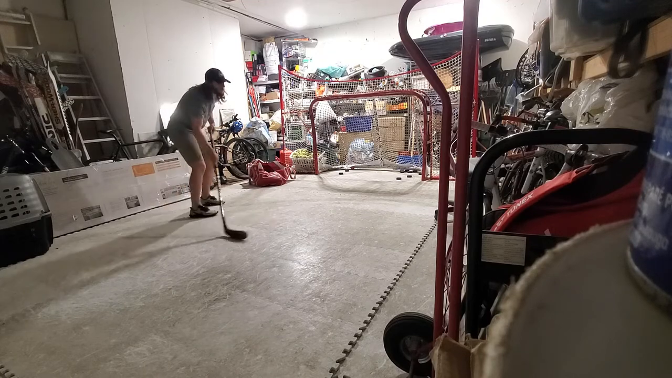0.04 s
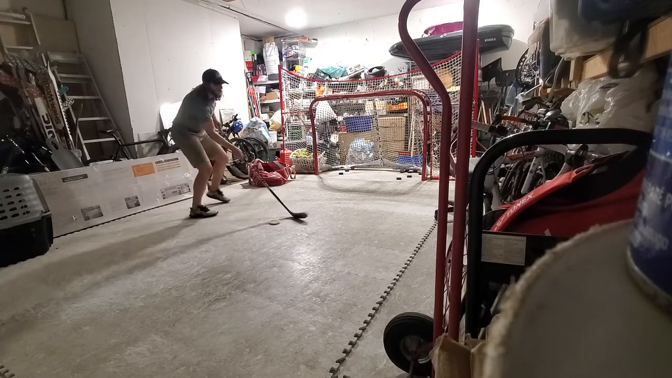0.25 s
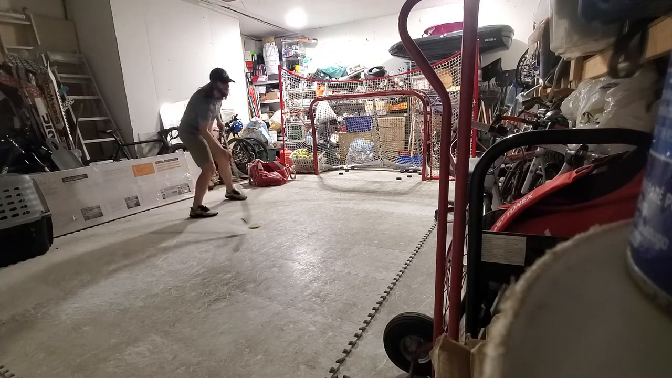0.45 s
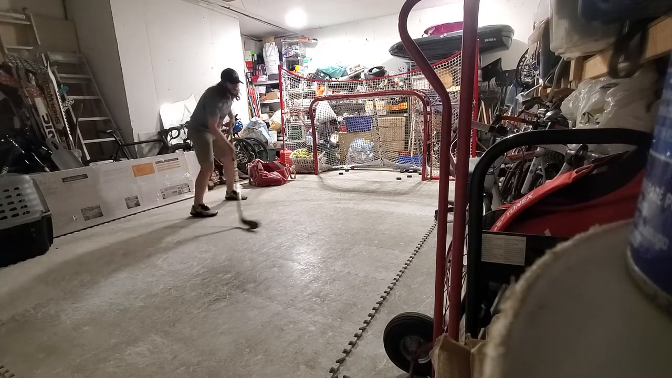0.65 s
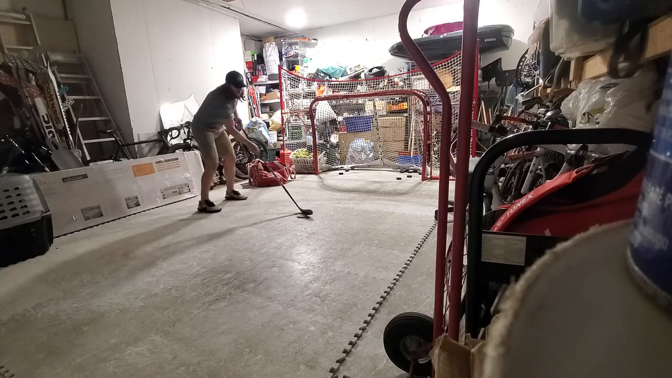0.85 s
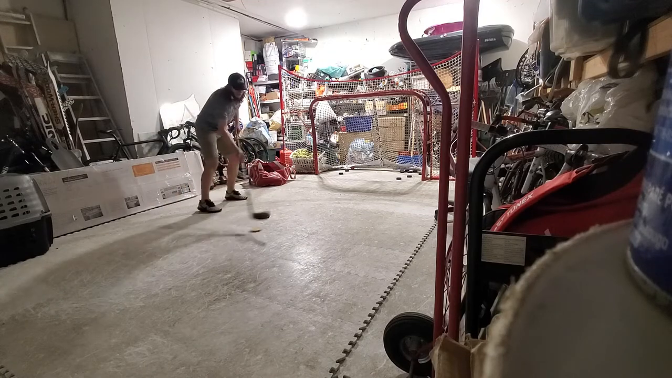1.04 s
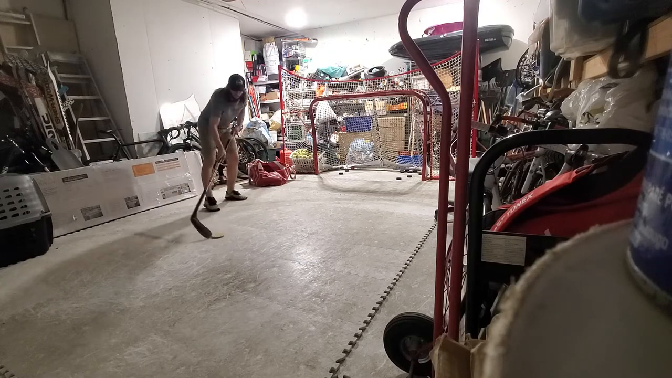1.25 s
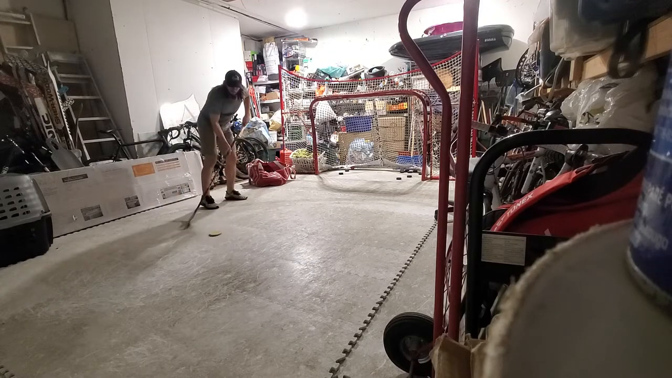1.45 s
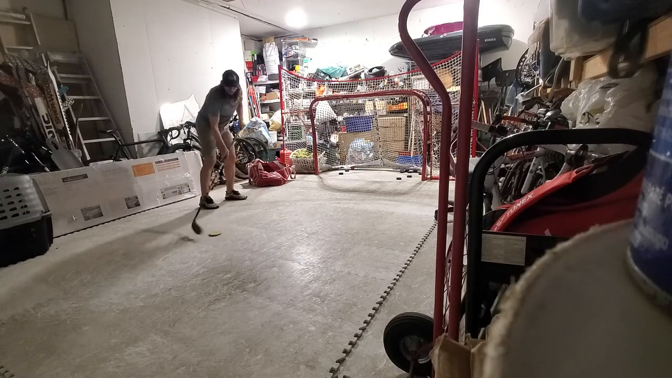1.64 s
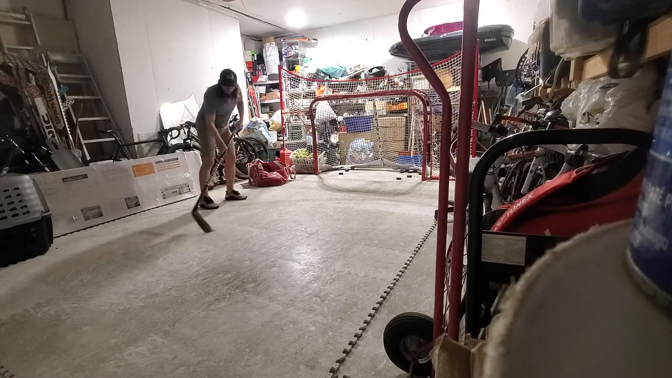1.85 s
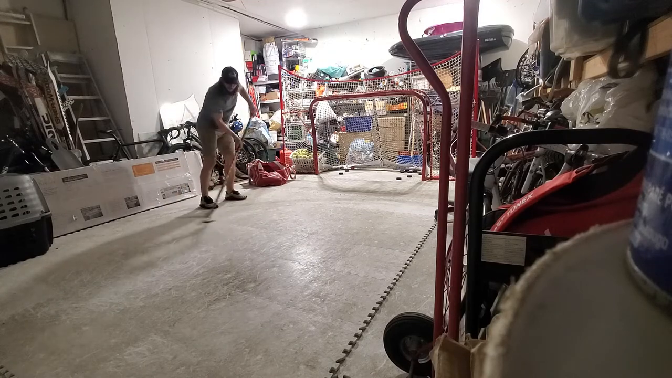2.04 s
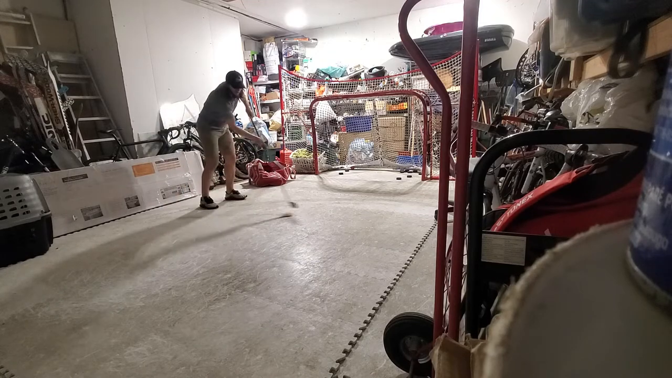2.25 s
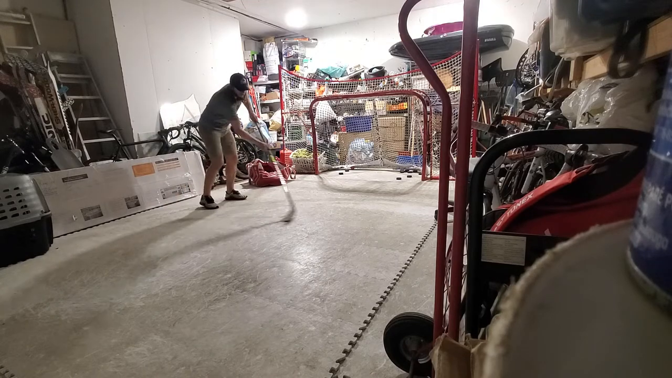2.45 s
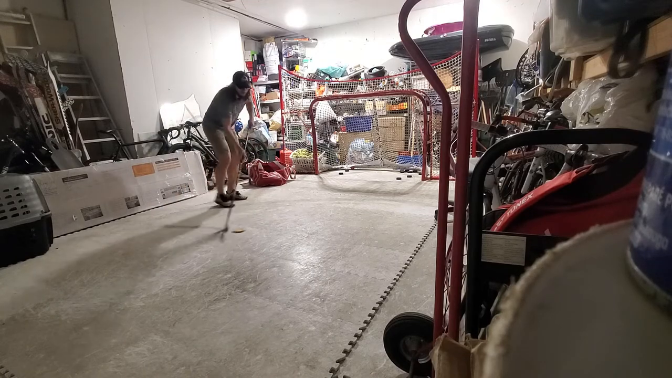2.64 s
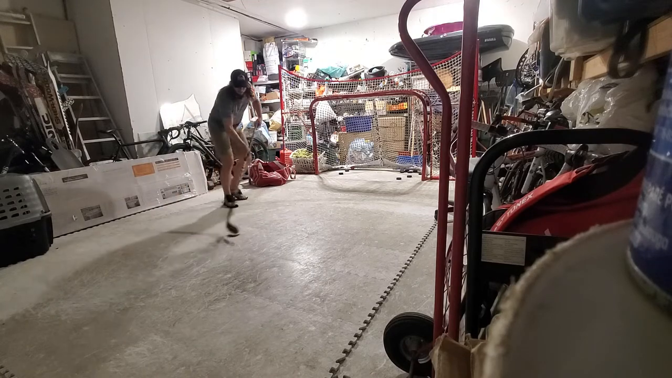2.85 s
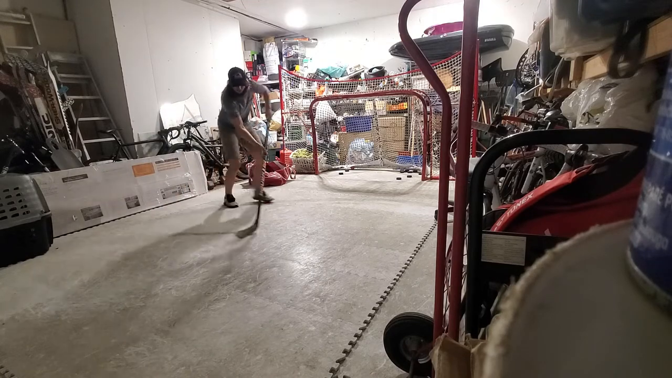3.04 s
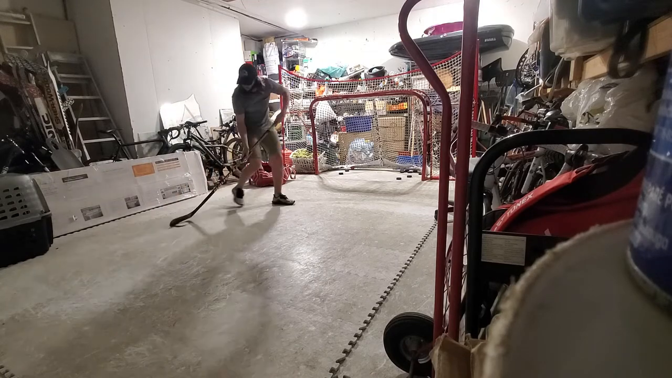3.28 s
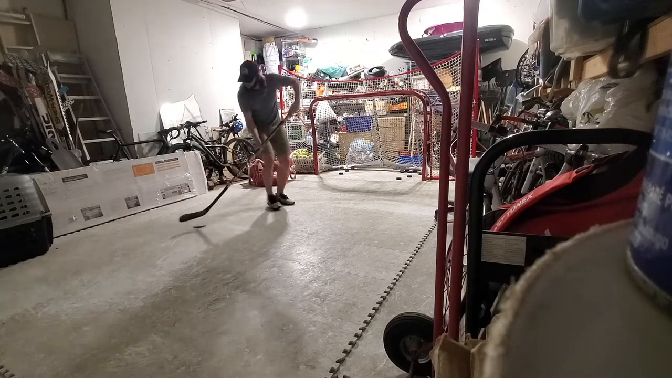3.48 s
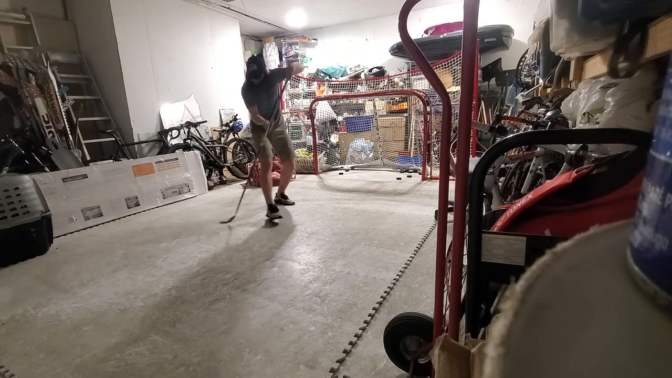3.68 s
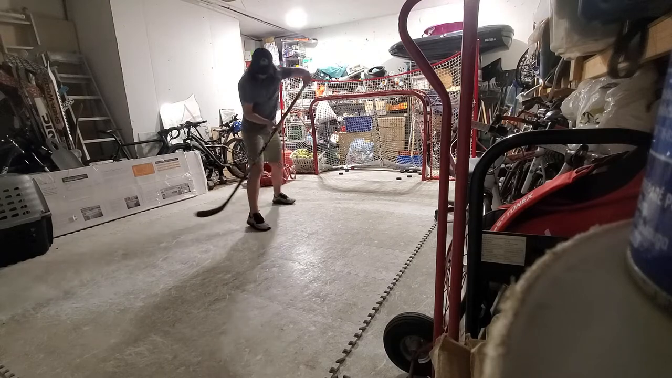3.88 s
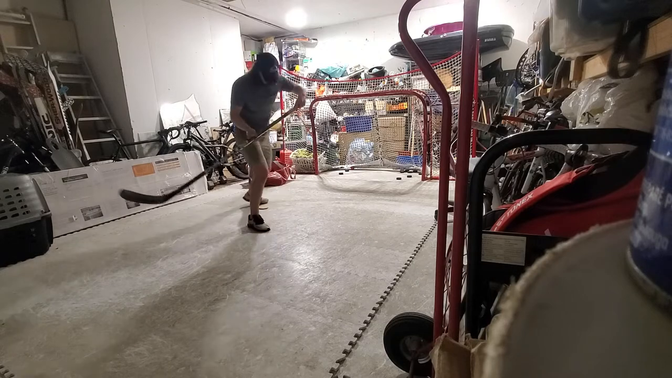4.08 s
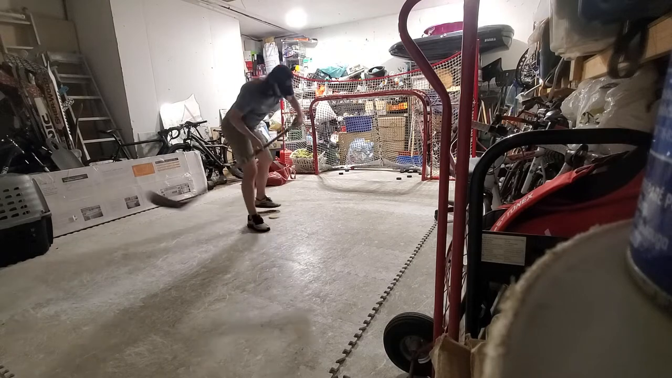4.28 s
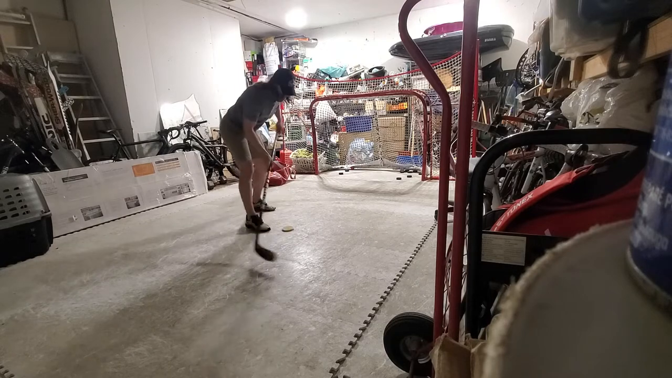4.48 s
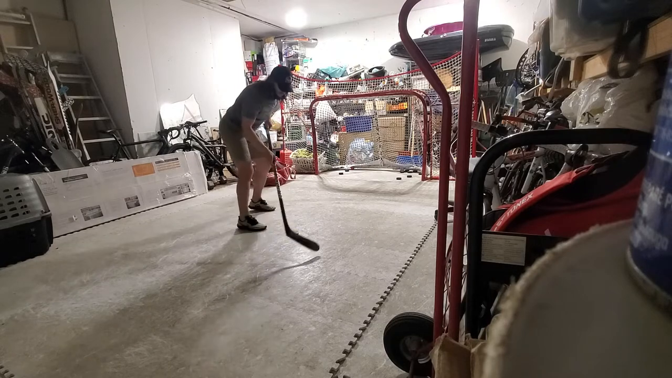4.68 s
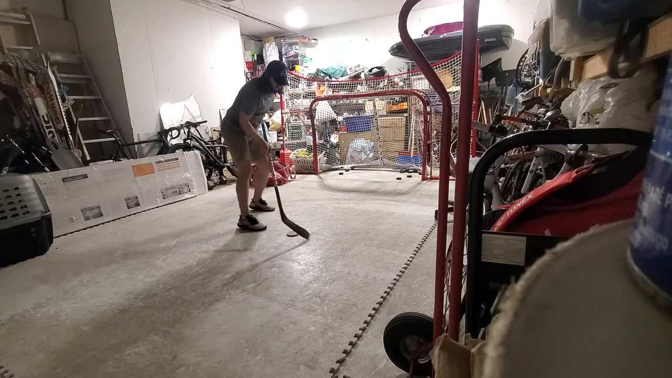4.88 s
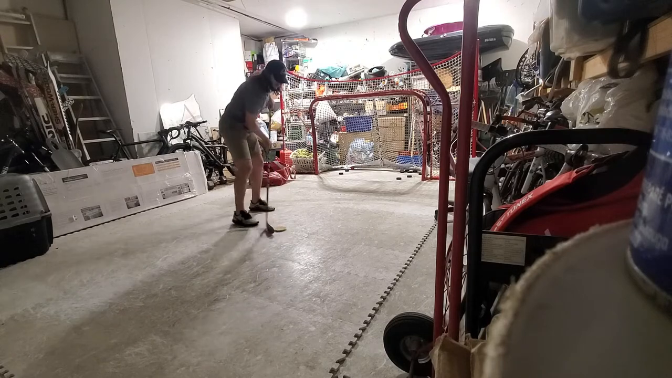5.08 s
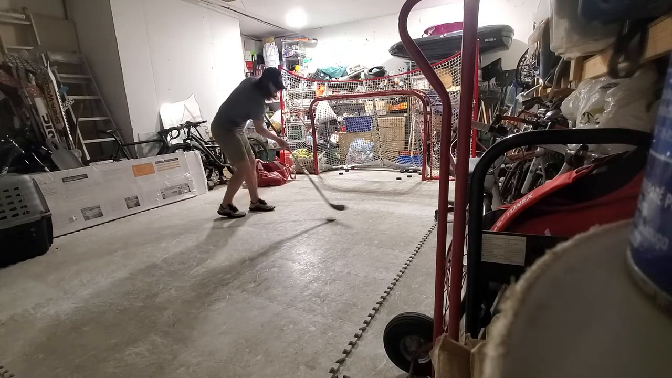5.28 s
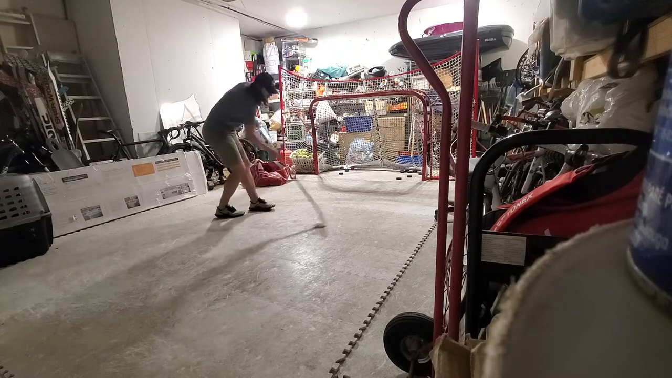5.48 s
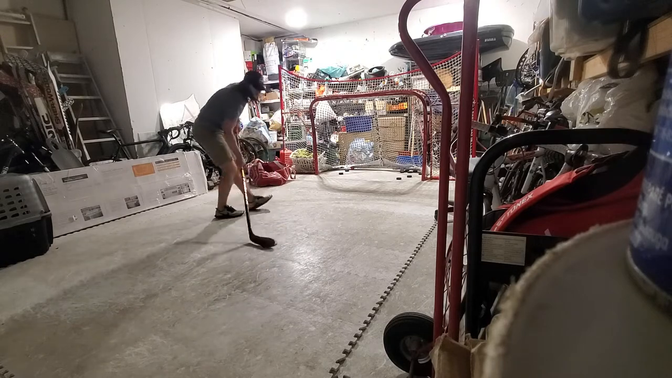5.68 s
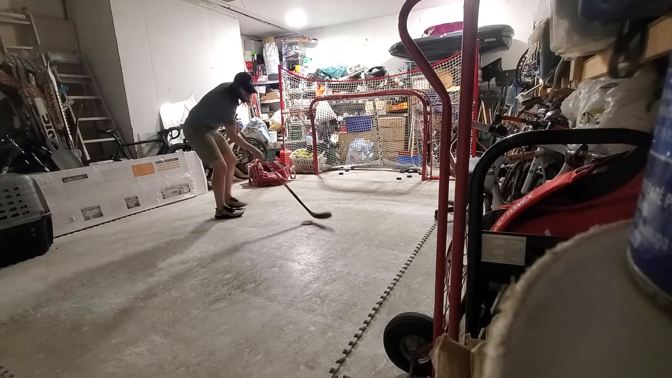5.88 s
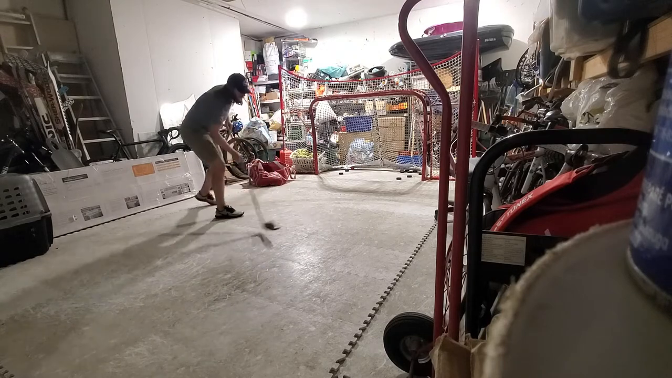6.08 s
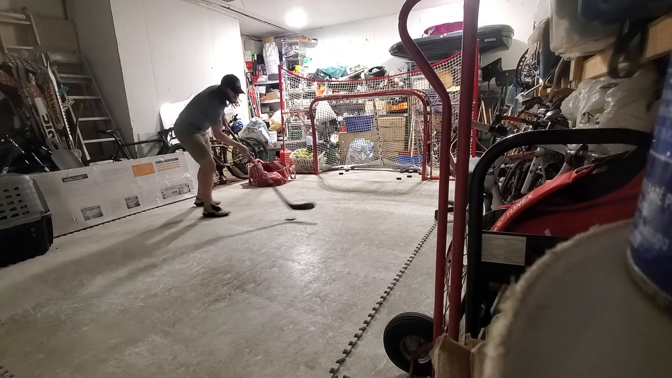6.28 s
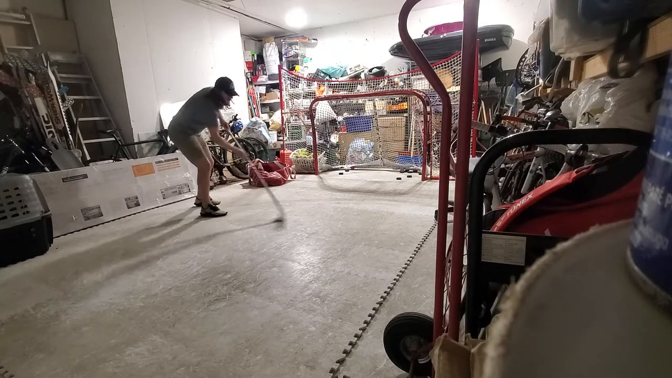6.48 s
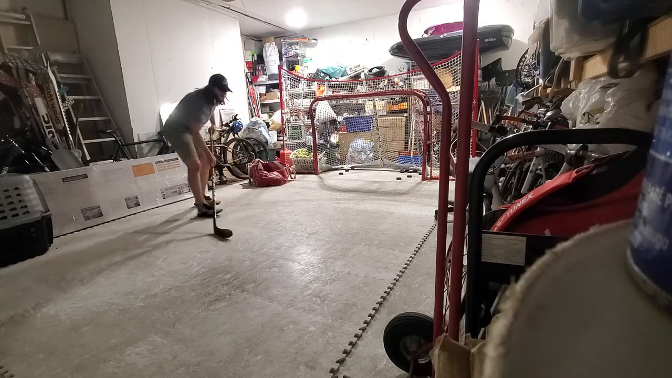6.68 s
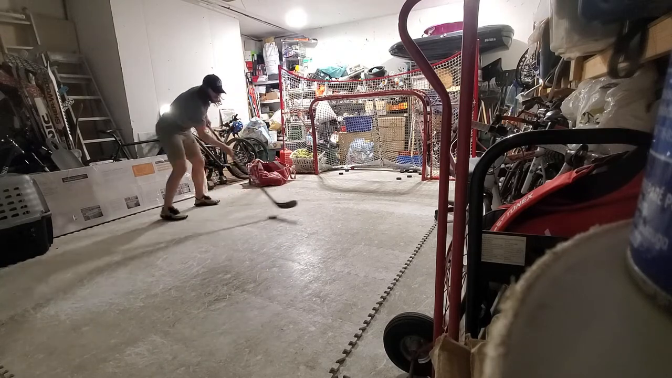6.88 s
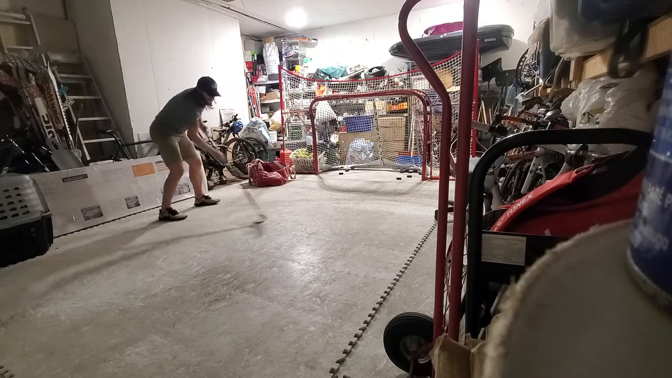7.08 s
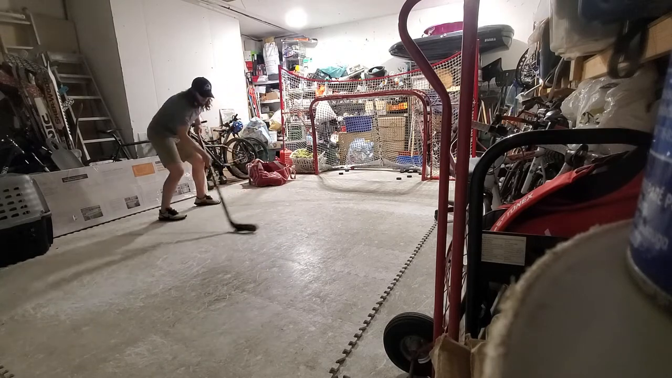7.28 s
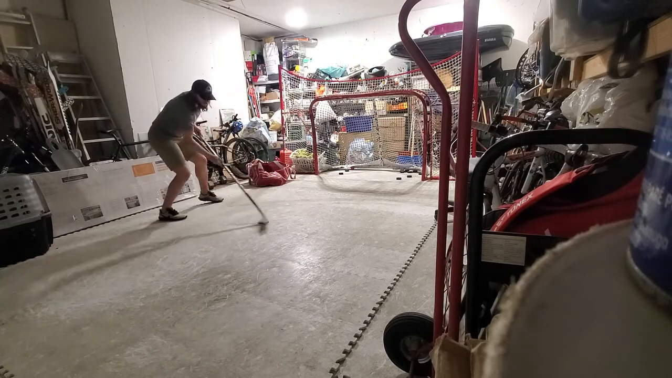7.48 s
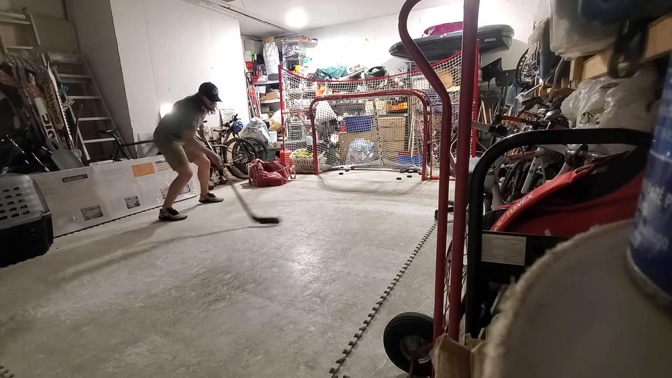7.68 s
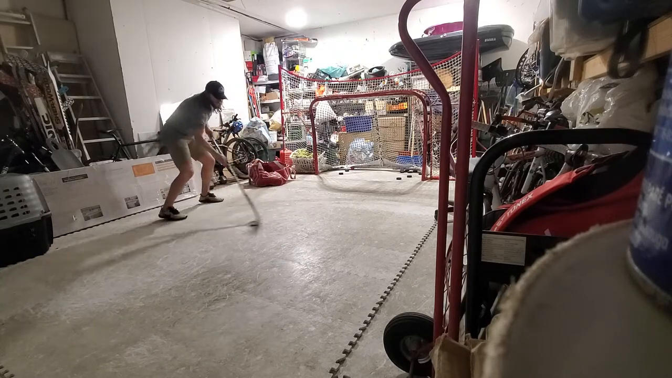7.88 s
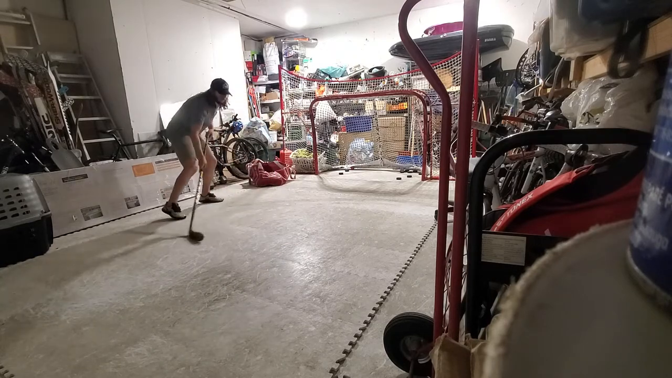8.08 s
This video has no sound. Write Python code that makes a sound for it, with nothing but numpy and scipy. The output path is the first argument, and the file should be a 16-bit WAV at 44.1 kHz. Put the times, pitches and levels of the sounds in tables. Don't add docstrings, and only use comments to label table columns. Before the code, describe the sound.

A hockey stick blade cracks a puck back and forth on a concrete garage floor, sharp clacks ringing briefly, with short gritty scrapes between.

```python
import sys
import numpy as np
from scipy import signal
from scipy.fft import rfft, irfft, next_fast_len
from scipy.io import wavfile
from scipy.ndimage import uniform_filter1d, minimum_filter1d

SR = 44100
rng = np.random.default_rng(int(sys.argv[2]) if len(sys.argv) > 2 else 0)


def gain_from_db(level_db):
    decades = np.asarray(level_db, float) / 20
    return 10 ** decades


def log_audio(samples):
    frames = np.atleast_2d(samples).T
    limited = np.clip(frames, -1, 1)
    pcm = np.round(limited * 32767).astype(np.int16)
    wavfile.write(sys.argv[1], SR, pcm)


N = 358533
LEAD = SR // 10
PORT_LAG = 17 / SR

# t/s, blow level/dB, floor thud/dB, puck clack/dB, edge tick/dB
BLOWS = [(0.346, -8, -16.5, -3, -13), (0.586, -5.5, -17.5, -10.5, -21), (0.893, -8.5, -15, -3.5, -17.5),
         (1.188, -16, -12, 2, -6.5), (1.843, -27, -13, -2, -17), (2.42, -9.5, -13.5, -4.5, -18),
         (2.736, -15, -12, -9.5, -25.5), (3.054, -13.5, -12.5, -7.5, -19.5),
         (3.378, -19.5, -10.5, 4, -10.5), (3.692, -19, -7.5, 9.5, -1), (4.429, -38, 4, 5, -9),
         (4.872, -19, -11, 1.5, -9.5), (5.465, -12, -15.5, 0, -11.5), (5.690, -9, -7, -4, -10),
         (6.007, -8.5, -10.5, -2.5, -11), (6.203, -7, -18.5, -5.5, -10), (6.454, -7, -13, -3.5, -15.5),
         (6.704, -11, -10, -5, -13.5), (7.007, -9.5, -12, -5, -14.5), (7.228, -9, -5.5, -4.5, -12),
         (7.512, -8, -10, -6.5, -13.5), (7.677, -10.5, -8, -5, -13.5), (7.876, -9.5, -7, -8, -17.5),
         (8.118, -9, -8.5, 0, -7.5)]
EARLIER = [
    (-0.00086, -21.5, -8.5, -4, -24),
]


def evened(x):
    return x / np.sqrt(np.mean(x ** 2) + 1e-20)


def read(points, hz):
    f, value = np.transpose(points)
    return np.interp(np.log(hz + 1), np.log(f + 1), value)


def add(mix, s, sound):
    part = mix[..., round(s * SR):][..., :sound.shape[-1]]
    part += sound[..., :part.shape[-1]]


def coloured(x, points):
    size = next_fast_len(x.shape[-1])
    gain = gain_from_db(read(points, np.fft.rfftfreq(size, 1 / SR)))
    return irfft(rfft(x, size) * gain, size)[..., :x.shape[-1]]


def causal(db):
    mirrored_db = np.concatenate([db, db[-2:0:-1]])
    log_gain = np.log(gain_from_db(np.maximum(mirrored_db, -100)))
    return np.fft.ifft(np.exp(np.conj(signal.hilbert(log_gain)))).real[:len(db)]


def floor():
    # f/Hz, level/dB
    quiet_colour = [(12, -42), (20, 1), (86, 4), (506, -19.5), (616, -1), (1080, -14), (6530, -18.5),
                    (15200, -22), (16500, -33)]
    return gain_from_db(-60) * evened(coloured(rng.standard_normal((2, N)), quiet_colour))


def garage(count):
    # f/Hz, t60/s
    decay = [(100, 0.43), (300, 0.36), (1000, 0.37), (3000, 0.51), (7000, 0.51), (11000, 0.33),
             (16000, 0.43)]
    # f/Hz, level/dB
    early_colour = [(200, -39), (700, 3), (3000, 8.5), (12000, 7.5)]
    # f/Hz, share [0..1]
    likeness = [(30, 0.2), (60, 0.23), (130, 1), (290, 0.76), (640, 0.72), (1400, 0.16), (3000, 0.018),
                (15000, 0.037)]
    # f/Hz, share of the port lag [0..1]
    detour = [(300, .8), (700, .65), (2500, 1)]
    taps = np.zeros((count, 2, SR * 5 // 8))
    slots = np.arange(10, taps.shape[2] - 5, 5)
    at = slots + rng.integers(0, 5, (count, 2, len(slots)))
    np.put_along_axis(taps, at, rng.standard_normal(at.shape), 2)
    hz, t, z = signal.stft(taps, SR, nperseg=512)

    same = np.clip(read(likeness, hz), 0, 1)[:, None]
    delay = np.exp(-2j * np.pi * hz * PORT_LAG * read(detour, hz))[:, None]
    z[:, 1] = same * z[:, 0] * delay + np.sqrt(1 - same ** 2) * z[:, 1]

    early = 1 + gain_from_db(read(early_colour, hz))[:, None] * gain_from_db(-60 * t / 0.025)
    fade = gain_from_db(-60 * t / read(decay, hz)[:, None])
    tails = signal.istft(z * early * fade, SR, nperseg=512)[1]
    tails *= 1 - np.exp(-np.arange(tails.shape[2]) / SR / 0.0051)
    return tails / np.linalg.norm(tails[:, :1], axis=2, keepdims=True)


def add_near_paths(room, stretch):
    # t/s, level/dB
    near = [
        (0, -11.5),
        (.0012, -12.5),
        (.0027, -15),
        (.0046, -16),
    ]
    edge = np.array([1, -0.51])
    ports = [(0, 0), (PORT_LAG / 2, -4.5)]
    for s, db in near:
        for port, (lag, shade_db) in enumerate(ports):
            add(room[port], s * stretch + lag, gain_from_db(db + shade_db + 2.0) * edge)


def pressure(start, length, on):
    press_s, lift_db_per_s = 0.039, 302
    t = np.arange(N)[on] / SR
    stop = min([s for s, *_ in BLOWS if s > start] + [N / SR])
    press = np.sin(np.pi / 2 * np.clip((t - start) / press_s, 0, 1)) ** 2
    lift = gain_from_db(-lift_db_per_s * np.clip(t - start - length, 0, 1))
    return press * lift * (t < stop)


def drags():
    # t/s, length/s, grit/dB, rumble over grit/dB,
    # fizz over grit/dB
    strokes = [(.76, 0.11, -36.5, -5, -14), (1.23, 0.19, -31.5, 4.5, -15), (1.37, 0.17, -44.5, 12.5, -8),
               (1.861, 0.16, -29, 1.5, -16), (2.09, 0.062, -28.5, 3.5, -12.5), (3.07, 0.08, -23.5, -5, -14.5),
               (4.879, 0.22, -28, 1, -16), (5.138, 0.082, -27, 1, -16), (5.25, 0.13, -34.5, -11.5, -15),
               (5.78, 0.068, -35, -1.5, -14), (6.32, 0.056, -27, -28, -13.5),
               (6.76, 0.14, -29.5, -11.5, -15.5),
               (.12, 0.049, -34, 2.5, -12.5), (2.02, 0.1, -35.5, 8.5, -9.5), (2.28, 0.086, -48, -2, -10),
               (2.6, 0.11, -48.5, -5, -10.5), (2.9, 0.088, -56.5, 5, -12), (3.28, .07, -52.5, 7, -5),
               (3.58, .1, -56.5, 2, -8), (3.86, 0.11, -44.5, -4, -12), (3.96, 0.14, -46.5, -7, -7.5),
               (4.07, 0.067, -39, -24, -6.5), (4.2, 0.1, -34, -7.5, -9.5), (4.25, 0.043, -46.5, 6.5, -9),
               (4.45, .12, -51.5, -2, -13), (4.609, 0.042, -37, -15, -13), (6.62, 0.034, -51.5, -2, 5),
               (7.17, .04, -52, 8, -6)]
    # f/Hz, level/dB
    grit = [(180, -48.5), (300, -14.5), (900, -33), (1000, -29.5), (1190, -6.5), (1790, -7), (3860, 0),
            (8000, -16.5), (10400, -59), (17600, -120)]
    # f/Hz, level/dB
    rumble = [(30, -47), (75, -25), (115, -17.5), (250, -2), (400, -5), (700, -3), (1100, -4), (1800, -10),
              (3500, -14), (8000, -51)]
    # f/Hz, level/dB
    fizz = [(4410, 9), (7500, 3.5), (8330, 4), (9010, 5.5), (10500, 0.5), (14900, -2), (16000, 1)]
    grain_db = 2.56 * np.minimum(rng.exponential(1, (3, N)), 5)
    grains = rng.standard_normal((3, N)) * gain_from_db(grain_db)
    bumps = evened(uniform_filter1d(rng.standard_normal(N), 600))
    flutter = gain_from_db(1.5 * bumps)
    layers = np.array([evened(coloured(g, c)) * flutter for g, c in zip(grains, (grit, rumble, fizz))])

    swells = [(s + 0.049, 0.067, db - 35.5, 10, -7.5) for s, db, *_ in EARLIER + BLOWS]
    power = np.zeros((3, N))
    for start, length, grit_db, rumble_db, fizz_db in strokes + swells:
        on = slice(round(start * SR), round((start + length + .25) * SR))
        layer_db = grit_db + np.array([[2.1], [rumble_db + 1.0], [fizz_db + 6.5]])
        power[:, on] += (gain_from_db(layer_db) * pressure(start, length, on)) ** 2
    return (np.sqrt(power) * layers).sum(0)


def blow(row, chance):
    parts_hz = [280, 700, 1500, 4000, 12000]
    # f/Hz, level/dB
    crack_colour = [(25, -44), (60, -24.5), (150, -7.5), (350, 0), (520, -6.5), (700, -2.5), (1000, -5.5),
                    (1440, -13), (2200, -16.5), (3300, -17), (5000, -20), (8300, -28.5), (15200, -36),
                    (17000, -50)]
    # f/Hz, level/dB, t60/s
    blade = [(252.7, -19, 0.34), (388, -14, 0.065), (478, -9, 0.028), (651, 0.9, 0.03), (800, 4, 0.012)]
    _, db, thud_db, clack_db, tick_db = row
    hz, t = np.fft.rfftfreq(4096, 1 / SR), np.arange(2049) / SR

    slap_db = 0.52 * clack_db
    parts_db = [thud_db + 9.5, 0, slap_db + 6.5, clack_db + 9.5, tick_db + 13.0]
    weights = list(zip(parts_hz, parts_db))
    crack = causal(read(crack_colour, hz) + read(weights, hz) + 20.55)

    ring_hz, ring_db, t60 = np.transpose(blade)[:, :, None]
    ring_hz = ring_hz * (1 + 0.039 * chance[:len(blade), None])
    ring_db = ring_db - 23.5 + 1.8 * chance[6:6 + len(blade), None]
    ring = (gain_from_db(ring_db - 60 * t / t60) * np.sin(2 * np.pi * ring_hz * t)).sum(0)
    return -gain_from_db(db + 23.5) * (crack + ring)


def scene():
    landings = [
        (3.392, -17.5, -7, -3.5, -28),
        (3.716, -16.5, -6, -2, -25),
        (4.442, -34, -1.5, -11, -24),
        (2.14, -30, -8, 0, -21.5),
        (5.21, -28.5, -9, -3, -24),
    ]
    # f/Hz, level/dB
    balance = [(40, -4), (70, 5), (110, -4), (200, 2.5), (380, 4.5), (700, 0.5), (1290, -1), (2380, 5),
               (4400, 2.5), (8120, 6), (15000, 8)]
    rows = EARLIER + BLOWS
    chance, rooms = rng.standard_normal((len(rows), 12)), garage(count=len(rows))
    for room, c in zip(rooms, chance):
        add_near_paths(room, stretch=gain_from_db(1.2 * c[-1]))

    mix = np.zeros((2, N + LEAD))
    for k, row in enumerate(rows + landings):
        spot = k % len(rows)
        heard = signal.fftconvolve(blow(row, chance[spot])[None], rooms[spot], axes=1)
        add(mix, row[0] + LEAD / SR, heard)

    spots, spots_per_s = 8, 9
    place = np.arange(N) / SR * spots_per_s
    away = abs((place - np.arange(spots)[:, None]) % spots - spots / 2)
    sends = drags() * np.cos(np.pi / 2 * np.minimum(away, 1))
    slides = signal.fftconvolve(sends[:, None], rooms[:spots], axes=2).sum(0)[:, :N]
    mix = mix[:, LEAD:] + slides

    tilt = np.array(balance) * [1, .5]
    return np.array([coloured(mix[0], tilt), coloured(mix[1], tilt * [1, -1])]) + floor()


def band_limit(x):
    return signal.sosfilt(signal.butter(12, 17080, fs=SR, output="sos"), x)


def record(dry):
    # f/Hz, level/dB
    mic = [(45, -14), (90, 0), (160, 2), (330, 1.5), (600, 2.5), (1600, 0), (2500, -4), (4000, -7.5),
           (6800, -5), (7800, -8), (11000, 2), (15800, 2.5), (16100, -27), (17000, -25)]
    x = coloured(dry, mic)

    power_db = 10 * np.log10(abs(uniform_filter1d((x ** 2).mean(0), size=500)) + 1e-12)
    x = x * gain_from_db(1.14 * np.minimum(power_db + 53.5, 0))

    peak_db = 20 * np.log10(abs(x).max(0) + 1e-6)
    fall = np.arange(N) * 350.0 / SR
    held_db = np.maximum.accumulate(peak_db + fall) - fall
    over_db = np.maximum(held_db + 7.5, 0)
    over_db = uniform_filter1d(-minimum_filter1d(-over_db, size=401), size=200)
    return band_limit(np.clip(x / gain_from_db(0.21 * over_db), -1, 1))


dry = scene()
out = record(dry)
log_audio(out)
```